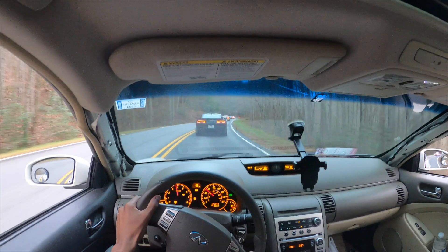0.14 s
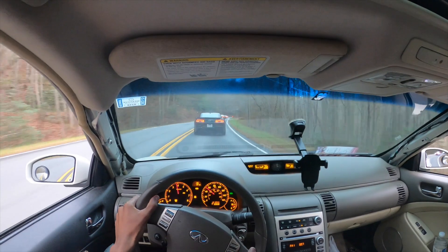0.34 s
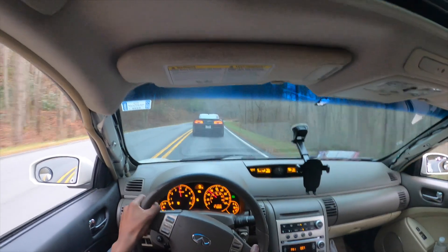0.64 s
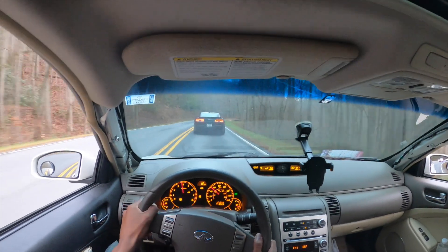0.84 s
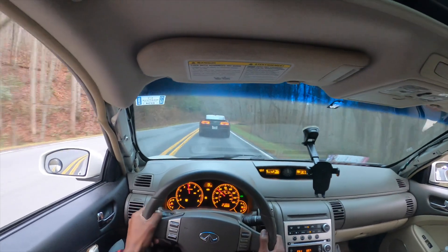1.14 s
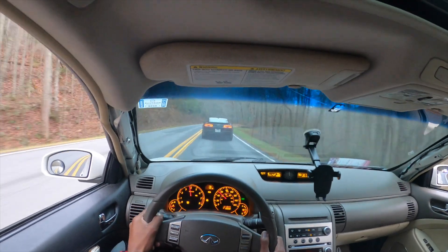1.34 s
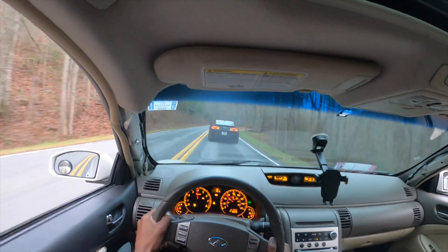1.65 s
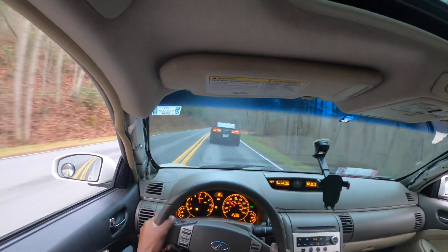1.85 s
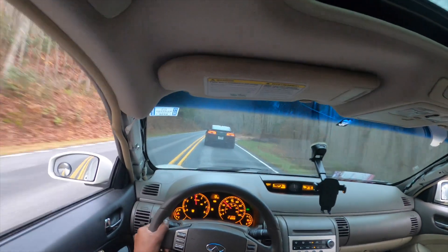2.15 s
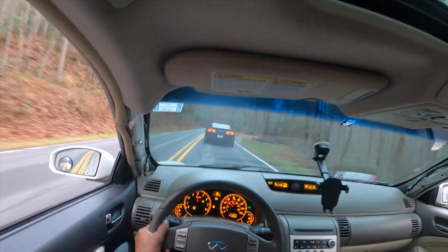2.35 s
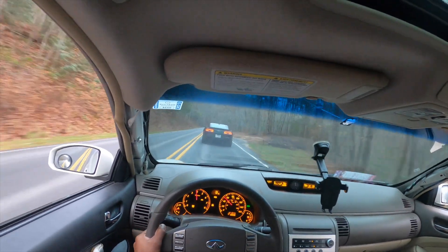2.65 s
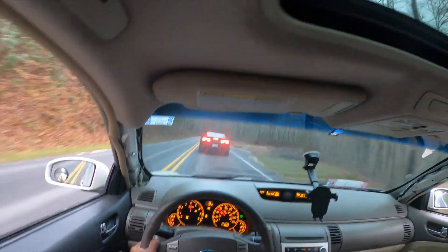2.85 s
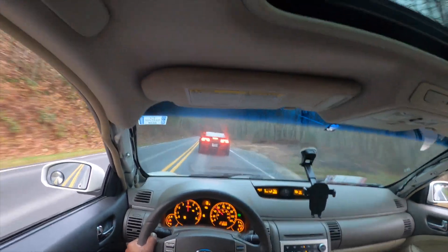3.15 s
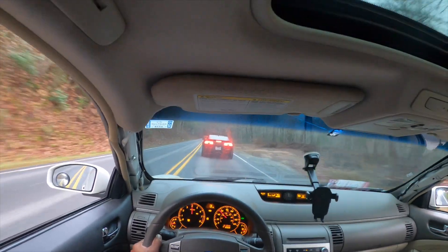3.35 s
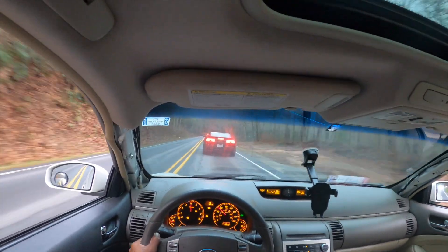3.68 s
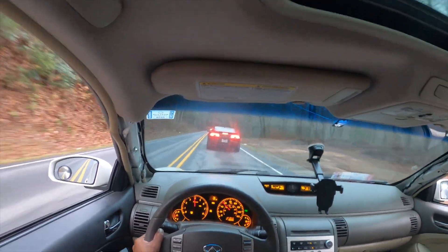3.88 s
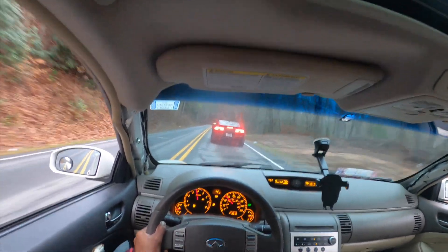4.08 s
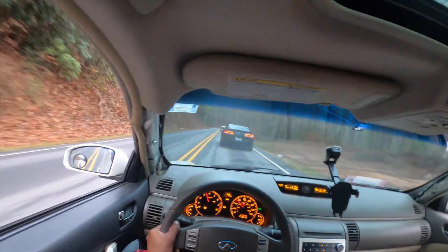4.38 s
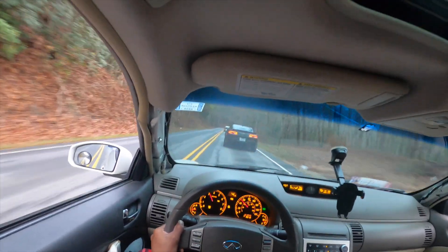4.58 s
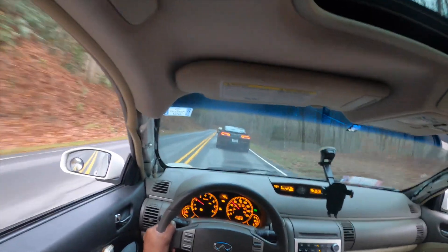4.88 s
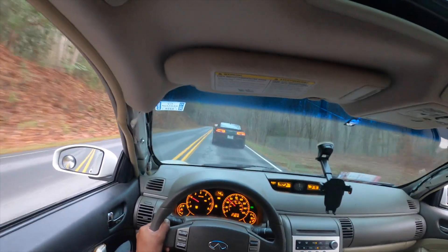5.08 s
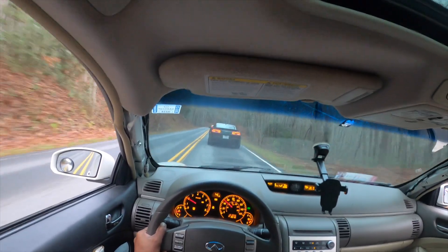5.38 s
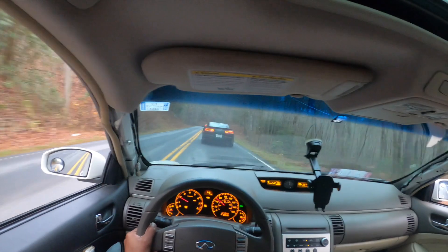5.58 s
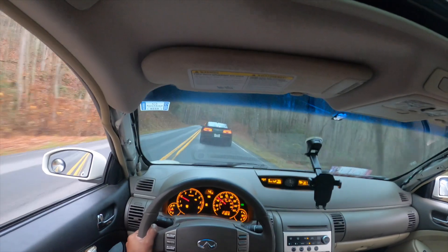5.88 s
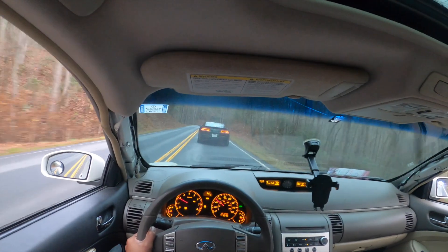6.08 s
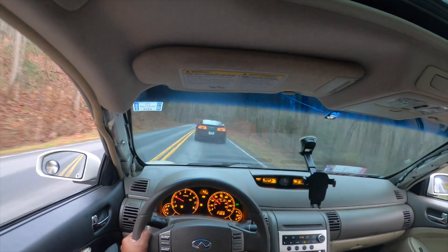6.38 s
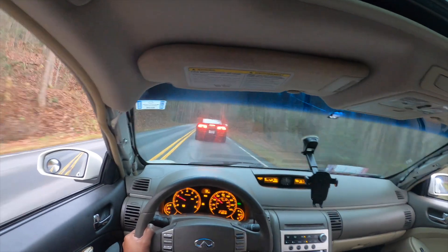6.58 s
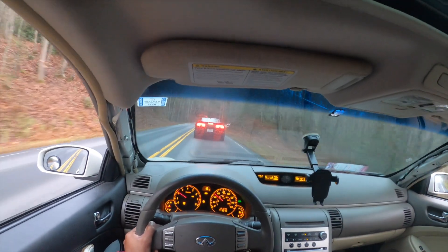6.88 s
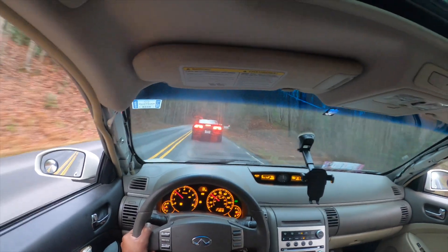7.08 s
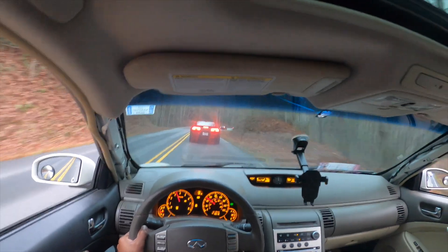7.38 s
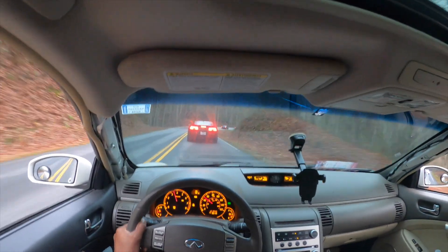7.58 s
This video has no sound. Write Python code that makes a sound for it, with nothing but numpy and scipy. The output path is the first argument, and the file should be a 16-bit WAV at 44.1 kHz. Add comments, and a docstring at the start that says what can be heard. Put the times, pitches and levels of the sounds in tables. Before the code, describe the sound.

Loud aftermarket-style exhaust inside a moving car: deep booming drone, rough overtones and steady road roar. Passing banks throw back extra growl and plastic trim rattles early. The engine pulls harder, eases off, burbles and falls to a low hum, with cabin knocks around the drop. Near the end it climbs quickly with a faint hiss, then slackens. Microphone at the driver's seat, wide at first, mono later.

```python
"""The steady drone of a loud V6 exhaust comes first, over tyre and wind roar, inside a coupe on a winding road.
Two microphone ports at the driver's seat hear harmonics of the engine cycle swell with three pedal presses;
the cabin boom sags briefly, at some lifts and twice during the second press, and filtered noise burbles.
Roadside banks return the growl as drifting harmonics; close by, loose trim buzzes and bumps knock as ringing
clicks. Noise puffs make the exhaust hiss, and just past midway the stereo narrows to mono."""
import sys
import numpy as np
from scipy import signal
from scipy.fft import rfft, irfft
from scipy.io import wavfile
from scipy.ndimage import uniform_filter1d

SR = 44100
rng = np.random.default_rng(int(sys.argv[2]) if len(sys.argv) > 2 else 0)


def dump(signal):
    """Clip the signal to [-1, 1] and save it as 16-bit WAV at the path in sys.argv[1]."""
    limited = np.clip(np.atleast_2d(signal).T, -1, 1)
    pcm = np.round(limited * 32767).astype(np.int16)
    wavfile.write(sys.argv[1], SR, pcm)


N = 340893
TIME = np.arange(N) / SR
HZ = np.fft.rfftfreq(N, 1 / SR)
CYLINDERS = 6  # firings to an engine cycle; an "order" is a multiple of the cycle rate


def amp(db):
    """Decibels to gain."""
    return 10 ** (np.asarray(db) / 20)


def evened(x):
    """Scales to an rms of one."""
    return x / np.sqrt(np.mean(x ** 2) + 1e-20)


def curve(rows):
    """A control curve at every sample, straight between the rows."""
    return np.interp(TIME, *np.transpose(rows))


def read(points, hz):
    """A spectrum table read on a log-frequency axis."""
    f, value = np.transpose(points)
    return np.interp(np.log(hz + 1), np.log(f + 1), value)


def wander(rate_hz):
    """Slow chance of rms one, up to about the given rate."""
    return evened(irfft(rfft(rng.standard_normal(N)) / (1 + (HZ / rate_hz) ** 4), N))


def gate(start, length, rise, release):
    """Attack, hold and release, from 0 to 1; the release follows the length."""
    attack = (TIME - start) / rise
    decay = 1 - (TIME - start - length) / release
    return np.clip(np.minimum(attack, decay), 0, 1)


# likeness of the two microphone ports: f/Hz, likeness (0-1)
PORT_LIKENESS = [(30, 1), (150, 0.5), (350, 1), (700, 0.84), (1400, 0.58), (2800, .5), (5500, 0.05),
                 (10000, 0)]
# balance of the two ports: f/Hz, left over right level/dB
PORT_BALANCE = [(30, 1.1), (200, 1), (350, 2.3), (700, 1.1), (1400, 3.2), (2800, 4.7), (5500, 1.5),
                (12000, 1)]


def noise(tone):
    """Two-channel noise of a given colour and an rms of one, less alike toward the treble."""
    a, b = rfft(rng.standard_normal((2, N)))
    same = read(PORT_LIKENESS, HZ)
    mid, side = a * np.sqrt(1 + same), b * np.sqrt(1 - same)
    lean = amp(read(PORT_BALANCE, HZ) / 2)
    ports = np.array([(mid + side) * lean, (mid - side) / lean])
    return evened(irfft(ports * amp(read(tone, HZ)), N))


def colour(x, tone, size=4096):
    """Gives clicks a causal, minimum-phase ring with the given spectrum shape and a peak of one."""
    log_gain = np.log(amp(read(tone, abs(np.fft.fftfreq(size, 1 / SR)))))
    ring = np.fft.ifft(np.exp(np.conj(signal.hilbert(log_gain)))).real[:size // 2]
    return signal.oaconvolve(x, ring / abs(ring).max())[:N]


def cabin(x, t60, wet_db, size=6000):
    """Direct sound plus dense, short reflections from glass and trim."""
    t = np.arange(size) / SR
    tail = rng.standard_normal((2, size)) * amp(-60 * t / t60) * (t > .002)
    tail /= np.linalg.norm(tail[0])
    return x + amp(wet_db) * signal.oaconvolve(np.atleast_2d(x), tail, axes=1)[:, :N]


# engine speed: t/s, firing rate f/Hz
FIRING_RATE = [(0, 171.5), (.12, 176.1), (1.87, 175.1), (2.51, 180.6), (2.76, 190.3), (2.95, 183.5),
               (3.42, 187.3), (3.83, 180.3), (4.22, 168.2), (4.45, 153.3), (4.64, 140.2), (4.79, 108.3),
               (4.94, 98.34), (5.35, 93.5), (6.69, 93.88), (7.07, 120.2), (7.29, 154.9), (7.45, 168.1),
               (7.62, 155.4), (7.73, 155)]


def revs_low(low_hz=95, cruise_hz=161):
    """One at low revs, zero when cruising, from the firing rate."""
    return np.clip((cruise_hz - curve(FIRING_RATE)) / (cruise_hz - low_hz), 0, 1)


# presses of the pedal: start t/s, length t/s, opening t/s, extra boom level/dB, extra overtone level/dB
PRESSES = [(2.001, .92, 0.44, 4, -0.5), (4.419, .28, .2, .5, 3), (6.783, .57, 0.12, 1.15, 2.5)]


def pedal(rise_s=None):
    """How far each press has opened the throttle, one row for each."""
    release_s = .18
    return np.array([gate(s, length, rise_s or opening, release_s) for s, length, opening, _, _ in PRESSES])


# brief sags of the boom, some at a lift off the pedal and two during the second press:
# deepest t/s, falling t/s, recovering t/s, drop of the boom level/dB
BOOM_SAGS = [(1.94, .11, 0.087, 7), (3.27, 0.25, 0.75, 9), (4.51, 0.086, 0.13, 7),
             (4.635, 0.027, 0.045, 12), (6.76, 0.085, 0.15, 8), (7.47, 0.061, .33, 8.5)]


def sagging():
    """How far each sag has set in, from 0 to 1, one row for each."""
    return np.array([gate(s - falling, falling, falling, recovering) for s, falling, recovering, _ in BOOM_SAGS])


def boom_level(steady_db=-14, rise_s=0.09, sway_db=-0.1, sway_hz=5):
    """The boom in dB: it swells under load and on the cabin's standing wave, sags briefly, and sways."""
    load_db = np.array(PRESSES)[:, 3] @ pedal(rise_s)
    drop_db = np.array(BOOM_SAGS)[:, 3] @ sagging()
    mode_hz, half_width_hz, mode_db = 123, 7.2, 1.5  # the cabin's standing wave
    ring_db = mode_db / (1 + ((curve(FIRING_RATE) - mode_hz) / half_width_hz) ** 2)
    return steady_db + load_db + ring_db - drop_db + sway_db * wander(sway_hz)


# road roar between 800 and 2000 Hz, before the overall lift in road(): t/s, level/dB
ROAD_LEVEL = [(0, -37), (.25, -36), (1.2, -34.5), (1.95, -33.5), (2.55, -39), (3.1, -39.5), (3.65, -35.5),
              (4.3, -37.5), (4.55, -34.5), (5.0, -38.5), (6.1, -36.5), (6.65, -33.5), (7.3, -36.5),
              (7.73, -40)]


def overtone_level(usual_road_db=-35.5, follows=0.87, sag_db=-1.5, sway_db=0.75, sway_hz=3):
    """The overtones in dB: they come in from outside with the road roar, and weaken as the boom sags."""
    pedal_db = np.array(PRESSES)[:, 4] @ pedal() + sag_db * sagging().sum(0)
    return follows * (curve(ROAD_LEVEL) - usual_road_db) + pedal_db + sway_db * wander(sway_hz)


# exhaust lines on a light throttle, before overtone_level(): order, cruising level/dB, low-revs level/dB
EXHAUST_LINES = [(4, -41, -59.5), (5, -33, -54), (7, -40, -51), (8, -35, -54), (9, -41.5, -35.5),
                 (10, -48, -38.5), (11, -46, -41.5), (12, -36.5, -23.5), (13, -49, -47.5),
                 (15, -43.5, -47.5), (17, -47, -47.5), (18, -34.5, -34), (19, -42.5, -60), (21, -43, -37.5),
                 (24, -44, -37), (26, -49, -56), (27, -54.5, -40.5), (30, -56, -52), (33, -54, -63),
                 (36, -56.5, -41), (42, -58.5, -44.5), (48, -58.5, -48), (54, -64.5, -67.5)]
# full throttle, where harmonics swell and fade as they cross the pipes' standing waves,
# before overtone_level(): firing rate f/Hz, then level/dB of firing harmonics 2 to 9
FULL_PULL = [(108, -35, -42, -38, -41.5, -37, -46, -52, -47),
             (123.4, -26, -25.5, -47, -36.5, -38.5, -59.5, -47.5, -57),
             (141.1, -23, -39, -24, -45, -62, -56, -55.5, -50),
             (150, -29.5, -28, -44, -25.5, -29, -48, -50.5, -44),
             (172, -29, -37, -46, -45, -50.5, -50, -56.5, -52),
             (184.8, -22.5, -27.5, -31, -30.5, -54, -60.5, -54.5, -62.5),
             (186.5, -19, -25, -37.5, -44, -51, -53, -44.5, -55)]


def exhaust(cycles, throttle, throb=0.11, rough=.35, steadied=0.65, flutter_hz=10, spread=0.35, between_db=-1):
    """Firing note and overtones; unequal cylinders and pipes add the lines in between."""
    firing, low_revs = curve(FIRING_RATE), revs_low()
    unsteady = 1 - steadied * throttle  # combustion evens out under load
    boom_swing = 1 + throb * unsteady * wander(22)
    boom = amp(boom_level()) * boom_swing * np.cos(2 * np.pi * CYLINDERS * cycles)
    unsteady = unsteady * (1 - .5 * low_revs)
    pull_hz, *pull_db = np.transpose(FULL_PULL)
    lines = np.zeros((2, N))
    for order, cruise_db, low_db in EXHAUST_LINES:
        harmonic, between = divmod(order, CYLINDERS)
        light_db = cruise_db + low_revs * (low_db - cruise_db)
        if between:
            full_db = light_db + between_db
        else:
            full_db = np.interp(firing, pull_hz, pull_db[harmonic - 2])
        level = amp(light_db + throttle * (full_db - light_db))
        flutter = evened(abs(1 + rough * unsteady * wander(flutter_hz)))
        angle = 2 * np.pi * (order * cycles + rng.random()) + rough * unsteady * wander(flutter_hz)
        skew = spread * rng.choice([-1, 1])  # standing waves reach the two ports out of step
        lines += level * flutter * np.cos([angle + skew, angle - skew])
    return np.sqrt(2) * (boom + lines * amp(overtone_level())) * amp([[.5], [-.5]])


# low-frequency swells, burbles of the exhaust and the low thump of a bump at 6.54 s:
# strongest t/s, half-length t/s, noise level/dB, throb level/dB
LOW_SWELLS = [(1.88, 0.059, -14, -34), (3.673, 0.45, -24, -30), (4.5, 0.29, -20.5, -44.5),
              (6.54, 0.053, -19, -40), (6.796, 0.085, -24, -46.5), (7.468, 0.1, -21, -16.5),
              (7.65, 0.21, -23.5, -38)]


def swelling():
    """How strong each low-frequency swell is, from 0 to 1, one row for each."""
    return np.array([gate(s - half, half, half, half) for s, half, _, _ in LOW_SWELLS])


def lope(cycles, throttle, load_db=-8, sag_db=-4, order=3, waver=.25, waver_hz=9):
    """Two unequal rows of cylinders throb at half the firing rate; the low swells add to the throb."""
    cruise_db, low_db = -28, -35.5
    steady_db = cruise_db + (low_db - cruise_db) * revs_low() + load_db * throttle + sag_db * sagging().sum(0)
    level = amp(steady_db) + amp(np.array(LOW_SWELLS)[:, 3]) @ swelling()
    wavering = 1 + waver * wander(waver_hz)
    return np.sqrt(2) * level * wavering * np.cos(2 * np.pi * (order * cycles + rng.random()))


# spectrum shape of the burble and low swells: f/Hz, relative level/dB per Hz
BURBLE_TONE = [(40, -38), (66, -3), (86, -6), (105, 1), (128, 4), (155, 1.5), (190, -10.5), (330, -62),
               (900, -120)]
# spectrum shape of the low rumble: f/Hz, relative level/dB per Hz
LOW_RUMBLE_TONE = [(5, -22), (18, -5), (28, 13.5), (42, 4), (56, -3.5), (80, -22.5), (200, -68.5),
                   (800, -120)]
# level of the low rumble, which dips during the first press, before its wander: t/s, level/dB
LOW_RUMBLE_LEVEL = [(0, -23), (1.95, -22), (2.85, -31), (3.5, -20), (4.65, -18.5), (4.95, -26.5),
                    (5.55, -23.5), (7.73, -27.5)]


def rumble(throttle, steady_db=-28, load_db=-9, low_revs_db=-4, wander_db=1.3, wander_hz=4):
    """Noise burbles in the pipes, steadily but less under load, and in swells; a deeper rumble wanders."""
    steady = amp(steady_db + load_db * throttle + low_revs_db * revs_low())
    swells = amp(np.array(LOW_SWELLS)[:, 2]) @ swelling()
    low_rumble = amp(curve(LOW_RUMBLE_LEVEL) + wander_db * wander(wander_hz))
    return noise(BURBLE_TONE) * (steady + swells) + noise(LOW_RUMBLE_TONE) * low_rumble


# spectrum shape of the tyre, wind and pipe roar: f/Hz, relative level/dB per Hz
ROAR_TONE = [(100, -30), (190, -4), (245, 1), (340, -2.5), (470, -1.5), (680, -8.5), (1050, -10.5),
             (1450, -16), (1900, -20), (2300, -24.5), (4000, -33.5), (5500, -39.5), (7400, -46.5),
             (8500, -53.5), (14000, -76)]
# treble of the roar, before the overall lift: t/s, level/dB
TREBLE_LEVEL = [(0, -32.5), (1.1, -33), (2.0, -31.5), (2.5, -35.5), (3.3, -34), (3.6, -32), (4.45, -33),
                (4.95, -41.5), (7.3, -40.5), (7.73, -44)]


def road(cycles, roar_db=8, flicker_db=0.7, flicker_hz=35, knee_hz=2500, chuff=0.13, order=3):
    """Tyre, wind and pipe roar as noise, flickering by chance and pulsing at half the firing rate."""
    roar = noise(ROAR_TONE)
    treble = irfft(rfft(roar) * HZ ** 2 / (HZ ** 2 + knee_hz ** 2), N)
    roar = (roar - treble) * amp(curve(ROAD_LEVEL)) + treble * amp(curve(TREBLE_LEVEL))
    pulsing = 1 + chuff * np.cos(2 * np.pi * order * cycles)
    return roar * pulsing * amp(roar_db + flicker_db * wander(flicker_hz))


# spectrum shape of the returned growl: f/Hz, relative level/dB
BANK_TONE = [(200, -23.5), (330, -8.5), (470, 5.5), (620, -1), (760, 4.5), (900, -8), (1080, -0.5),
             (1350, -23), (1800, -27.5)]
# roadside banks going by: closest t/s, half-length t/s, level/dB when closest
BANKS = [(1.376, .1, -33), (1.85, .24, -26), (5.41, .075, -30), (7.267, .15, -33)]


def bank(cycles, fading=0.49, fading_hz=4, count=50, far_db=-49.5):
    """Multiples of the cycle rate return from the banks, fading in and out as the car moves on."""
    coarse, cycle_hz = TIME[::200], curve(FIRING_RATE)[::200] / CYLINDERS
    growl = np.zeros(N)
    for order in range(12, 12 + count):
        # four paths, each with its own small Doppler shift
        drift_hz, start = fading_hz * rng.standard_normal((4, 1)), rng.random((4, 1))
        paths = np.exp(2j * np.pi * (drift_hz * coarse + start)).sum(0)
        steady = np.exp(2j * np.pi * rng.random())
        echo = (steady + fading * paths) * amp(read(BANK_TONE, order * cycle_hz))
        level = np.interp(TIME, coarse, abs(echo))
        phase = np.interp(TIME, coarse, np.unwrap(np.angle(echo)))
        growl += level * np.cos(2 * np.pi * order * cycles + phase)
    passing = sum(amp(db) / (1 + ((TIME - s) / half) ** 2) for s, half, db in BANKS)
    return evened(growl) * (amp(far_db) + passing) * amp([[1.2], [-1.2]])


# spectrum shape of one strike of the loose trim: f/Hz, relative level/dB
BUZZ_TONE = [(400, -25), (1600, -12), (2400, 5), (3100, 2), (3800, -4.5), (5000, -6.5), (6500, -23.5),
             (9000, -36.5), (14000, -68)]
# trim chattering against the dash: start t/s, length t/s, level/dB before the sag
BUZZES = [(1.262, 0.087, -28), (1.585, .39, -21.5)]


def trim(scatter_db=1.5, slop_s=.0005, sag_db_per_s=5.5):
    """A loose panel strikes and rebounds in every swing, never quite alike; each spell slowly weakens."""
    swing_hz, first_swing_s, rebound_s = 25.5, 1.199, .0098
    rise_s, release_s = 0.035, 0.064
    shaking = np.zeros(N)
    for s, length, db in BUZZES:
        shaking += amp(db - sag_db_per_s * (TIME - s)) * gate(s, length, rise_s, release_s)
    swings = np.arange(first_swing_s, TIME[shaking > 0][-1], 1 / swing_hz)
    hits = np.add.outer(swings, [0, rebound_s]).ravel()
    late, force = rng.standard_normal((2, len(hits)))
    clicks = np.zeros(N)
    clicks[((hits + slop_s * late) * SR).astype(int)] = amp(scatter_db * force)
    return cabin(colour(clicks * shaking, BUZZ_TONE), t60=0.11, wet_db=-4)


# spectrum shape of the hissing gas: f/Hz, relative level/dB per Hz
RASP_TONE = [(200, -37.5), (1450, 4.5), (2200, -0.5), (3000, 5.5), (3900, -0.5), (4450, 4), (5300, -4),
             (7000, -2.5), (8200, -8), (10500, -14), (14000, -24.5)]
# gas hissing at the top of a hard pull: start t/s, length t/s, level/dB at mid-swell before the sputter
HISSES = [(2.594, 0.48, -46.5), (7.174, 0.28, -45)]


def rasp(cycles, depth=0.43, sputter_db=1.5, sputter_hz=70):
    """Gas hisses out with each firing, unevenly, in spells that swell and fade."""
    puffs = 1 + depth * np.cos(2 * np.pi * CYLINDERS * cycles)
    level = sum(amp(db) * np.sin(np.pi * np.clip((TIME - s) / length, 0, 1)) for s, length, db in HISSES)
    return noise(RASP_TONE) * puffs * level * amp(sputter_db * wander(sputter_hz))


# spectrum shapes of the sharp tick and the dull thud: f/Hz, relative level/dB
TICK_TONE = [(400, -28), (1500, 3), (2400, -5), (3100, 10), (4600, 0.5), (6200, -17), (10500, -26.5),
             (14000, -35)]
THUD_TONE = [(60, -12), (250, 12.5), (700, 14.5), (1400, 4.5), (3000, -6), (5000, -31), (9000, -45.5),
             (14000, -72)]
# bumps in the cabin: t/s, dull level/dB, sharp level/dB, pitch factor of the tick, left over right level/dB
KNOCKS = [(4.2772, -11, -38, 0.84, 12), (4.2809, -9, -25, .7, 9), (4.2833, -7.5, -17, 0.82, -3),
          (4.288, -9, -33, 0.85, 11), (5.32, -19, -47, 0.76, -8), (5.356, -9, -15, 1.01, -9),
          (5.413, -13.5, -23, 0.82, 0), (5.4324, -12.5, -17, 1.18, -4), (6.542, -26, -20, 0.38, 1),
          (6.547, -9.5, -33, 0.81, -5)]


def knocks():
    """Each bump rings as a dull thud and a sharp plastic tick, with cabin reflections."""
    out = np.zeros((2, N))
    for s, dull_db, sharp_db, pitch, side_db in KNOCKS:
        blow = signal.unit_impulse(N, int(s * SR))
        thud = colour(blow * amp(dull_db), THUD_TONE)
        tick = colour(blow * amp(sharp_db), [(hz * pitch, db) for hz, db in TICK_TONE])
        out += (thud + tick) * evened(amp([[side_db / 2], [-side_db / 2]]))
    return cabin(out, t60=0.15, wet_db=-4.0)


def scene():
    """Engine speed and throttle drive the exhaust; road and cabin noises join it."""
    cycles = np.cumsum(curve(FIRING_RATE)) / CYLINDERS / SR
    throttle = pedal().sum(0)
    engine = exhaust(cycles, throttle) + lope(cycles, throttle)
    lows = rumble(throttle)
    outside = road(cycles) + bank(cycles)
    return engine + lows + outside + trim() + rasp(cycles) + knocks()


# just past midway the sound narrows to mono: t/s, stereo width (factor)
STEREO_WIDTH = [(4.3, 1), (4.45, 0.58), (4.65, 0.21), (4.85, 0.02), (5.1, 0)]
# the level dips briefly: centre t/s, half-length t/s, depth (0-1)
LEVEL_DIPS = [(4.0174, 0.0081, 0.82), (4.316, 0.023, 0.46)]


def record(dry, ceiling_db=-3, recovery_db=120, edge_hz=15600):
    """The stereo narrows, a quick limiter holds the peaks, the level dips briefly twice, then the band limit."""
    mid = dry.mean(0)
    ports = mid + (dry - mid) * curve(STEREO_WIDTH)
    peak_db = 20 * np.log10(abs(ports).max(0) + 1e-9)
    fall = TIME * recovery_db  # the held peak falls this many dB a second
    held_db = np.maximum.accumulate(peak_db + fall) - fall
    over_db = np.maximum(held_db - ceiling_db, 0)
    out = ports / amp(uniform_filter1d(over_db, size=90))
    for s, half, depth in LEVEL_DIPS:
        out = out * (1 - depth * np.exp(-((TIME - s) / half) ** 2))
    low_pass = signal.firwin(511, edge_hz, window=("kaiser", 9), fs=SR)
    return signal.oaconvolve(out, low_pass[None], "same")


dry = scene()
out = record(dry)
dump(out)
```